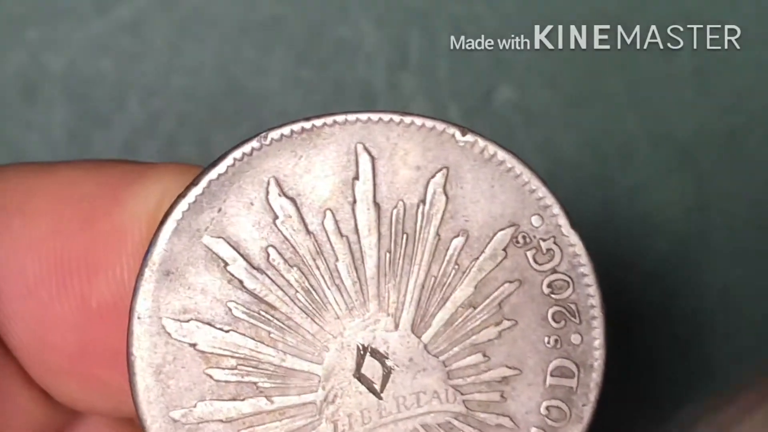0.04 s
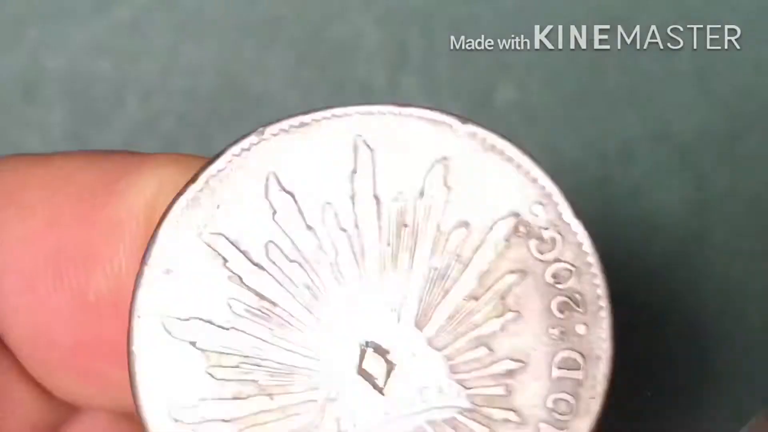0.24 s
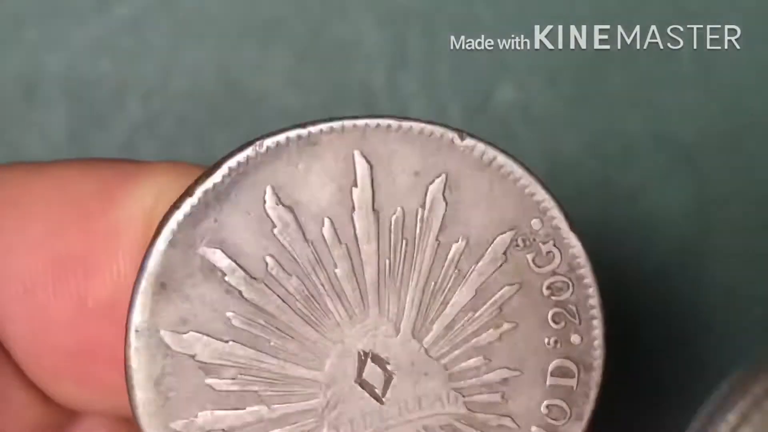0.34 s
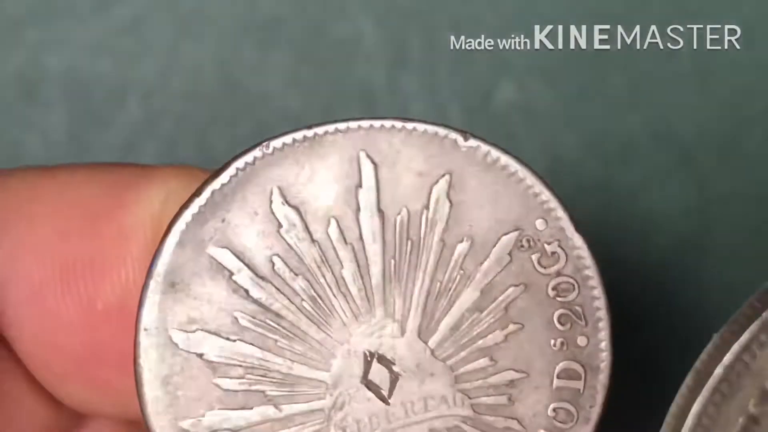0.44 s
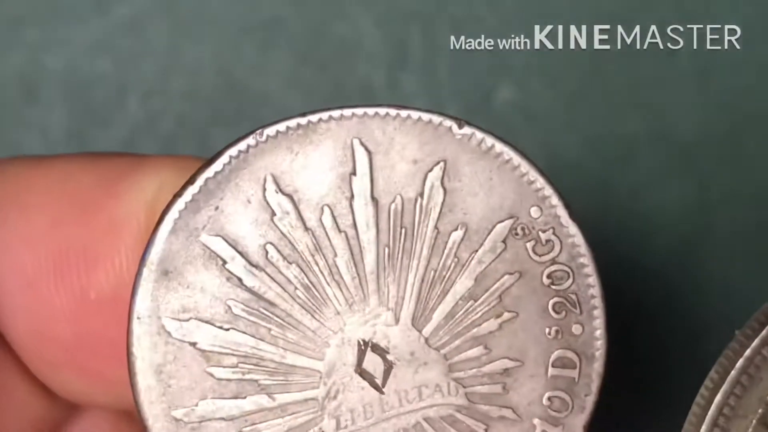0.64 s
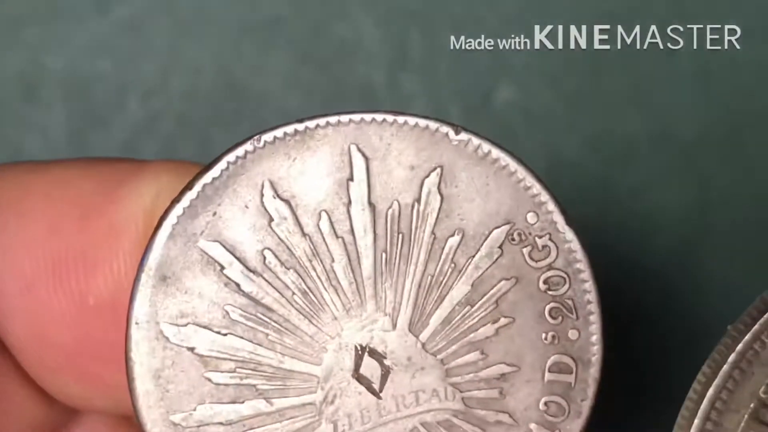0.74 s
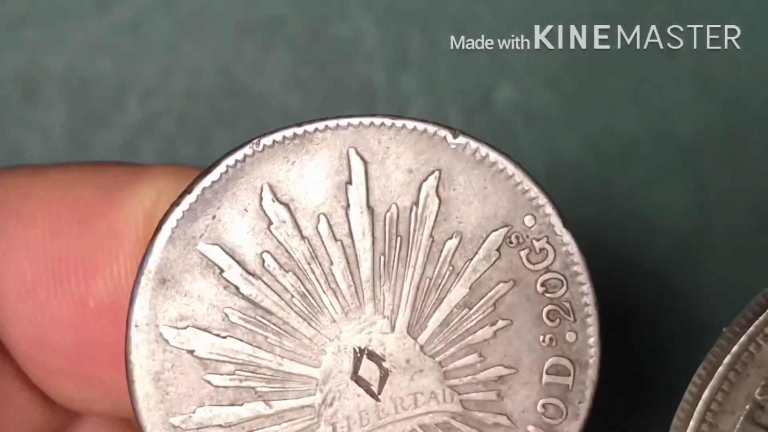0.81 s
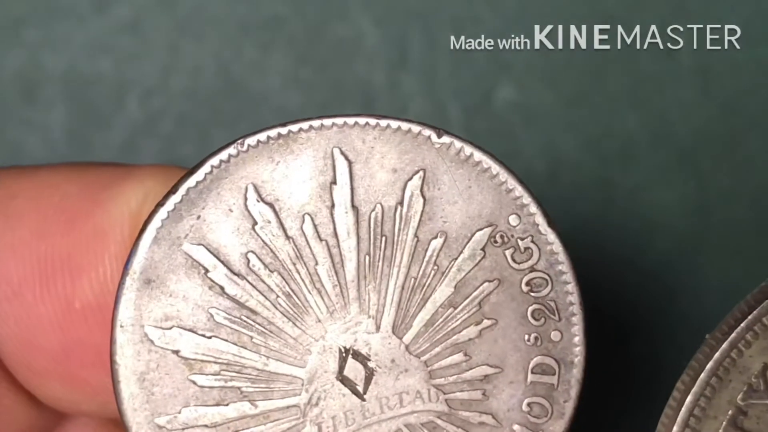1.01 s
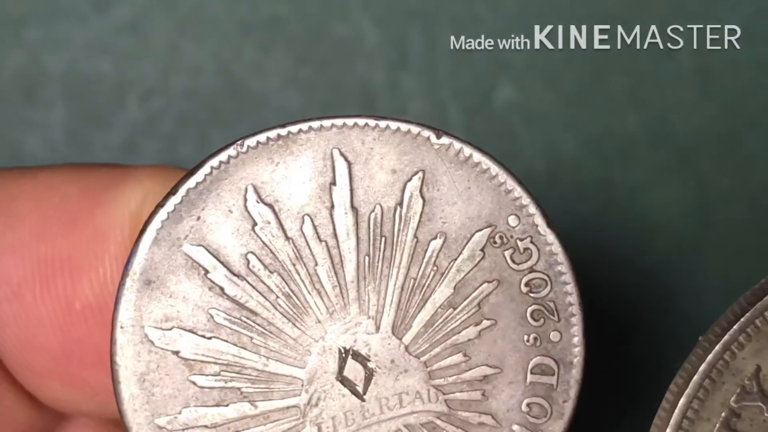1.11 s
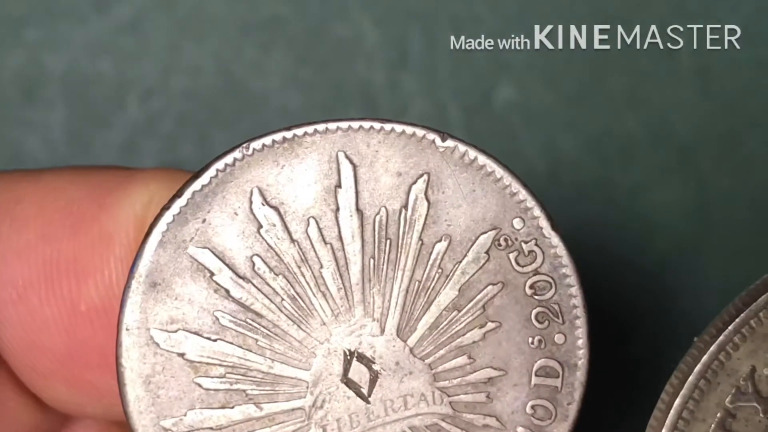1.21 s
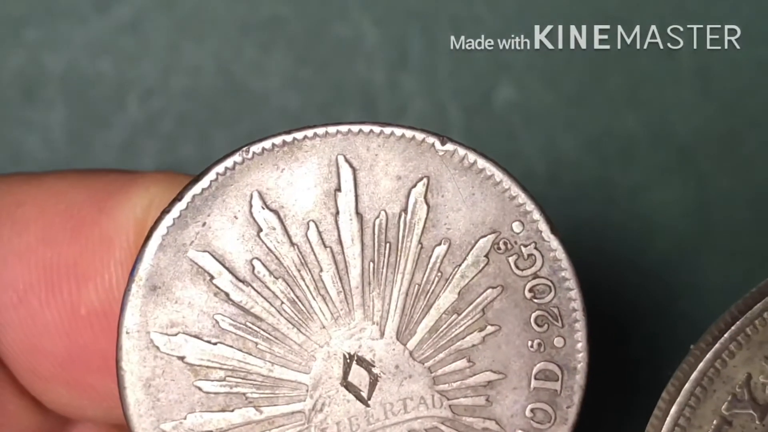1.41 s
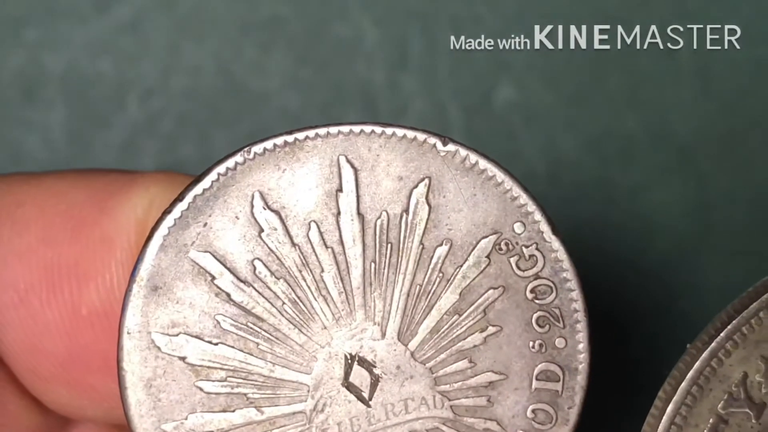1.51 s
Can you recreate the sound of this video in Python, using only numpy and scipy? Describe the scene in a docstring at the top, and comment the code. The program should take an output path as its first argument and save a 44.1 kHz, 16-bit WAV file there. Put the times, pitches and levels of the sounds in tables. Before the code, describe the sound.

A silver coin tapped once by another coin, ringing out a long, clear, shimmering high tone

```python
"""In a quiet room that rumbles low, a large silver coin on a fingertip is tapped once by a held coin.
The held coin is a set of short decaying sines; shaped noise makes the crack of the contact.
The silver coin is a set of long sines: a beating low pair and high tones that waver while it rocks.
Faint noise is the rustle of fingers and sleeve; the low pair of an earlier tap still fades at the start."""
import sys
import numpy as np
from scipy import signal
from scipy.fft import rfft, irfft
from scipy.io import wavfile

SR = 44100
rng = np.random.default_rng(int(sys.argv[2]) if len(sys.argv) > 2 else 0)


def inscribe(sig):
    """Save sig as 16-bit PCM at rate SR to the path in sys.argv[1].

    A 1-D sig is mono; a 2-D sig holds one channel per row.
    Samples are clipped to [-1, 1] before scaling.
    """
    pcm = np.round(np.clip(np.atleast_2d(sig).T, -1, 1) * 32767)
    wavfile.write(sys.argv[1], SR, pcm.astype(np.int16))


def volts_from_decibels(level):
    """Turn decibel levels (scalar or array-like) into linear amplitude factors."""
    exponent = np.asarray(level, float) / 20
    return 10 ** exponent


N = 68355
CLOCK = np.arange(N) / SR  # seconds
TAP_S = .2119
WALL_DELAY_S = .0135  # how much later sound arrives by way of the near wall

# The tones of the silver coin, free to ring; its swells and its path change the levels later.
# Each row: pitch in Hz, starting level in dB, time to fade by 60 dB in seconds.
SILVER_MODES = [(4421.89, -25, 3.2), (4453.8, -30, 3.4), (9919.6, -28, 1.53), (9896, -27, .33),
                (14335, -60, .55), (14368, -62, .5)]


def coloured_noise(points):
    """Noise of rms 1; its spectrum follows points of (Hz, relative dB per Hz)."""
    hz, db = np.transpose(points)
    log_hz = np.log(np.arange(1, N // 2 + 2) * SR / N)
    gain = volts_from_decibels(np.interp(log_hz, np.log(hz), db, left=-90, right=-90))
    noise = irfft(rfft(rng.standard_normal(N)) * gain, N)
    return noise / np.sqrt(np.mean(noise ** 2))


def decay(start_s, t60_s):
    """A steady fade: one at the start, 60 dB down after t60_s, nothing before."""
    age = CLOCK - start_s
    return (age >= 0) * volts_from_decibels(-60 * np.maximum(age, 0) / t60_s)


def over_time(rows):
    """The columns after the first (seconds), each joined over time by straight lines."""
    seconds, *columns = np.transpose(rows)
    return [np.interp(CLOCK, seconds, column) for column in columns]


def room_tone():
    """The low rumble of the quiet room: steady noise, strongest near 146 Hz."""
    # The colour of the rumble. Each row: frequency in Hz, relative level in dB per Hz.
    tone_colour = [(20, -43), (40, -24.5), (80, -15), (120, -10.5), (136, -5), (146, 2.5), (156, -4.5),
                   (175, -1.5), (200, -3), (222, -23.5), (240, -12.5), (249, -18.5), (259, -9),
                   (272, -18.5), (300, -29), (420, -26.5), (500, -31), (585, -30), (600, -23), (615, -31.5),
                   (800, -34), (1200, -42.5), (2500, -47.5), (4000, -57.5), (8000, -56.5), (15500, -63.5)]
    return volts_from_decibels(-44.5) * coloured_noise(tone_colour)


def rustle():
    """Fingers and sleeve shift, mostly before the tap: noise that rises and falls."""
    # How loud the rustle is. Each row: time in seconds, level in dB.
    rustle_levels = [(0, -65), (.05, -67.5), (.09, -73), (.12, -64), (.16, -68.5), (.21, -58.5),
                     (.3, -79.5)]
    # The colour of the rustle. Each row: frequency in Hz, relative level in dB per Hz.
    rustle_colour = [(1200, -20), (2200, -3.5), (3200, 5.5), (4500, 1.5), (8000, -3), (12000, -9),
                     (15500, -12.5)]
    return volts_from_decibels(over_time(rustle_levels)[0]) * coloured_noise(rustle_colour)


def earlier_tap():
    """The silver coin's low pair, still fading from the previous tap until the new one."""
    # What is left of the low pair at the start. Each entry: level in dB of one mode.
    left_db = [-67, -76]
    rings = 0
    for db, (hz, _, t60_s) in zip(left_db, SILVER_MODES):
        rings = rings + volts_from_decibels(db) * decay(0, t60_s) * np.sin(2 * np.pi * (hz * CLOCK + rng.random()))
    return rings * (CLOCK < TAP_S)


def crack():
    """The noise of the contact: a short burst, and a faint wash lingering in the room."""
    # The colour of the crack. Each row: frequency in Hz, relative level in dB per Hz.
    crack_colour = [(60, -9.5), (250, -3.5), (600, -13), (1200, 0.5), (2200, -8), (3400, 5), (5000, -5.5),
                    (6500, 1.5), (11000, -9), (15500, -6.5)]
    burst = volts_from_decibels(-22) * decay(TAP_S, .0081)
    wash = volts_from_decibels(-49) * decay(TAP_S, .3)
    return (burst + wash) * coloured_noise(crack_colour)


def room(sound):
    """Adds one echo off a near wall and a short tail of many blurred reflections."""
    echo_db, tail_db = -27, -26.5
    tail_start_s, tail_t60_s = .0068, .27
    tail = (rng.standard_normal(N) * decay(tail_start_s, tail_t60_s))[:SR // 2]
    tail = volts_from_decibels(tail_db) * tail / np.sqrt(np.sum(tail ** 2))
    echo = volts_from_decibels(echo_db) * np.interp(CLOCK - WALL_DELAY_S, CLOCK, sound)
    return sound + echo + signal.fftconvolve(sound, tail)[:N]


def held_coin():
    """Short modes, damped by the fingers, that build up during the contact."""
    # The tones of the held coin.
    # Each row: pitch in Hz, level in dB, time to fade by 60 dB in seconds.
    held_modes = [(5260, -53, .16), (5618, -48, .28), (5648, -31, .1), (5760, -44, .15), (7658, -11, .095),
                  (7725, -19, .045), (9596, -3, .022), (10290, -36, .04), (12800, -33, .08),
                  (12960, -2, .021), (12897, -30, .19), (13030, -34, .11), (13480, -22, .02)]
    contact_s = .0003
    age = CLOCK - TAP_S
    rings = 0
    for hz, db, t60_s in held_modes:
        rings = rings + volts_from_decibels(db) * decay(TAP_S, t60_s) * np.sin(2 * np.pi * hz * age)
    build_up = np.sin(np.pi / 2 * np.clip(age / contact_s, 0, 1)) ** 2
    return rings * build_up


def silver_coin():
    """Long modes that swell, sag and bend in pitch with the rocking."""
    # The coin rocks and settles, turning its low pair.
    # Each row: time in seconds, swell of the first mode in dB, swell of the second in dB.
    rocking = [(.229, 7.5, 9.5), (.245, 5.6, 3.5), (.257, 3.7, 1.6), (.273, 1.4, -.7), (.29, .4, -2.3),
               (.34, .4, 1), (.39, -1, -2), (.44, -1, -3.5), (.49, 0, 0), (.54, .2, .6), (.60, 1, 1),
               (.72, .6, .8), (1.1, 0, 0), (1.55, -.5, -1.5)]
    # The third mode points more narrowly and passes through a silence.
    # Each row: time in seconds, swell in dB.
    high_swell = [(.222, -4.5), (.232, -2.5), (.245, 5.5), (.27, 9), (.30, 6), (.34, 6.5), (.39, 5.5),
                  (.44, 1.5), (.49, 0), (.525, -9.5), (.538, -13.5), (.546, -38), (.554, -9.5),
                  (.565, -9.5), (.60, -8), (.65, -0.5), (.72, 0), (1.1, 0), (1.55, 0)]
    # The rocking also bends the pitches.
    # Each row: time in seconds, widening of the low pair in Hz, shift of the third mode in Hz.
    bends = [(.235, -3.6, 8), (.245, 4.3, 8), (.28, 4.1, 7), (.315, 2.1, 7), (.365, .2, 0),
             (.415, -1.1, -4), (.465, -1.1, -2), (.515, -.7, 0), (.565, -.4, 0), (.62, 0, 0)]
    # The twin of a pair starts against it. Each entry: the sign of one mode.
    polarity = [1, -1, 1, -1, 1, 1]
    age = CLOCK - TAP_S
    swells = over_time(rocking) + over_time(high_swell) + [0, 0, 0]
    # Adding up the extra Hz from the tap onwards gives the extra turns of each sine.
    wider, shift = [np.cumsum(hz * (age > 0)) / SR for hz in over_time(bends)]
    extra_turns = [-wider / 2, wider / 2, shift, 0, 0, 0]
    rings = 0
    for (hz, db, t60_s), sign, swell, turns in zip(SILVER_MODES, polarity, swells, extra_turns):
        wave = np.sin(2 * np.pi * (hz * age + turns))
        rings = rings + sign * volts_from_decibels(db + swell) * decay(TAP_S, t60_s) * wave
    # It sounds sideways: faint at first, then full by way of the near wall.
    direct, rise_s = volts_from_decibels(-9), .001
    wall_arrival = .5 * (1 + np.tanh((age - WALL_DELAY_S) / rise_s))
    path = direct + (1 - direct) * wall_arrival
    return path * rings


def scene():
    """Both coins, the crack, the earlier tap, the rustle and the room tone, in one channel."""
    background = room_tone() + rustle() + earlier_tap()
    tap = crack() + room(held_coin()) + silver_coin()
    return (background + tap)[None]


def top_cut(x):
    """Nothing passes above the cut-off."""
    return signal.sosfilt(signal.butter(12, 15360, fs=SR, output="sos"), x)


def record(dry):
    """The input overloads beyond full scale: higher peaks are cut off flat."""
    mix = np.clip(dry, -1, 1)
    return top_cut(mix)


dry = scene()
out = record(dry)
inscribe(out)
```